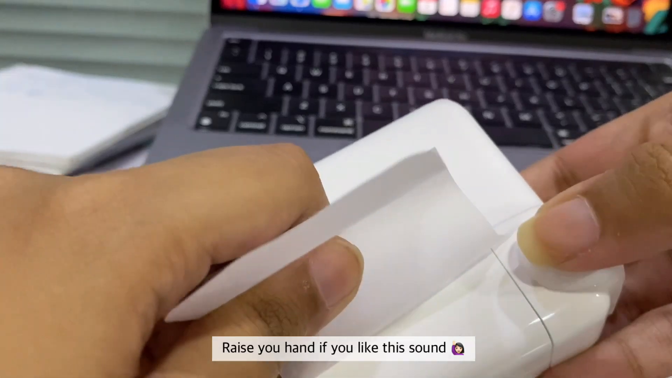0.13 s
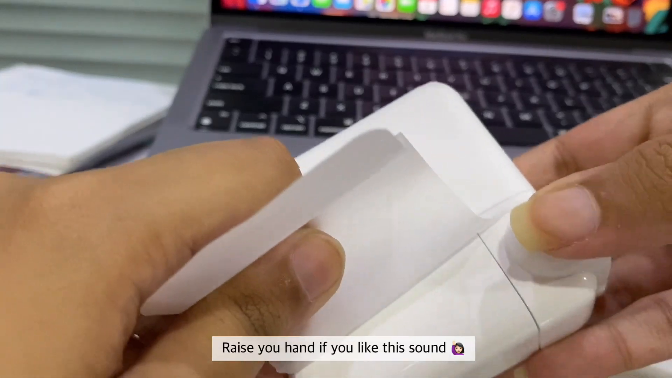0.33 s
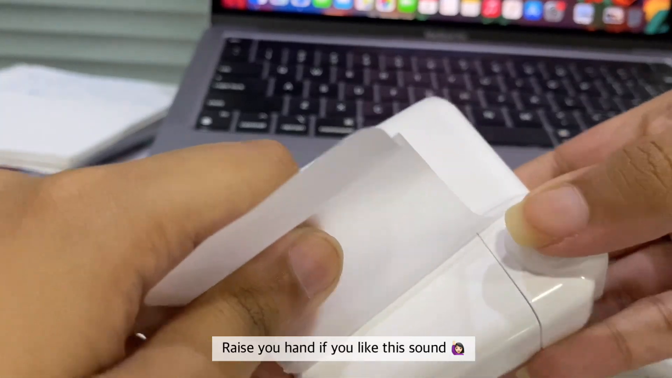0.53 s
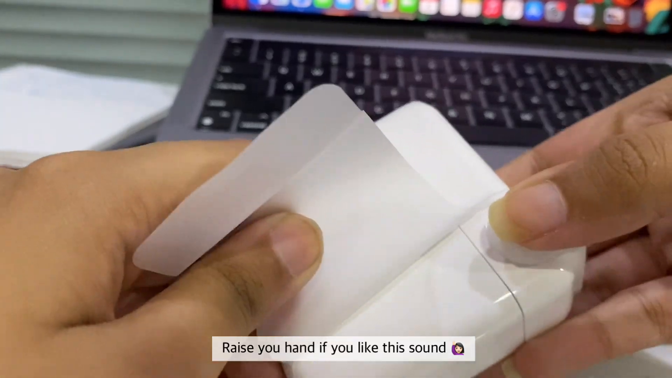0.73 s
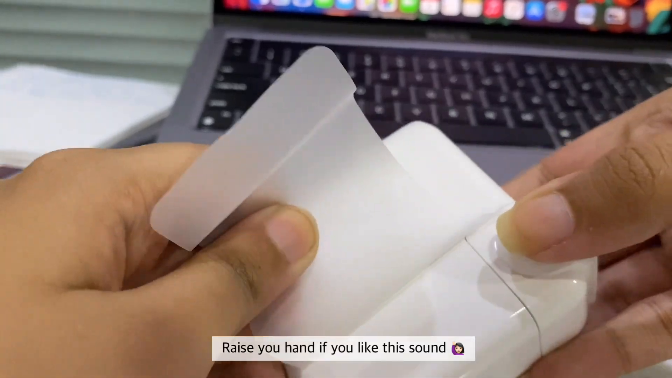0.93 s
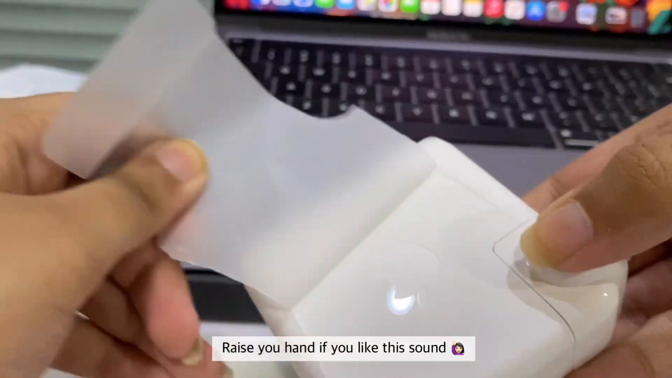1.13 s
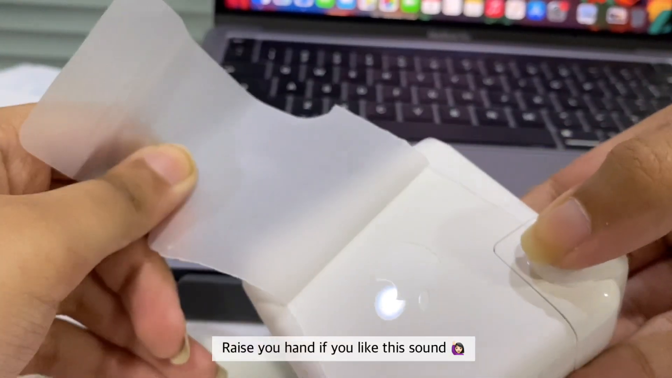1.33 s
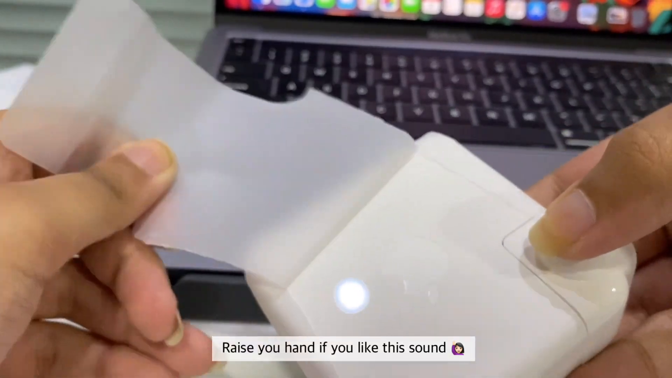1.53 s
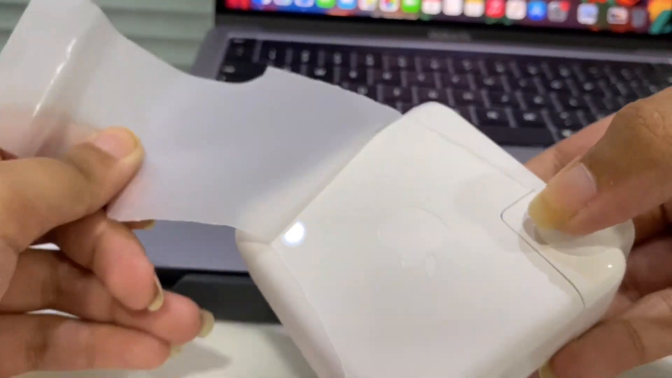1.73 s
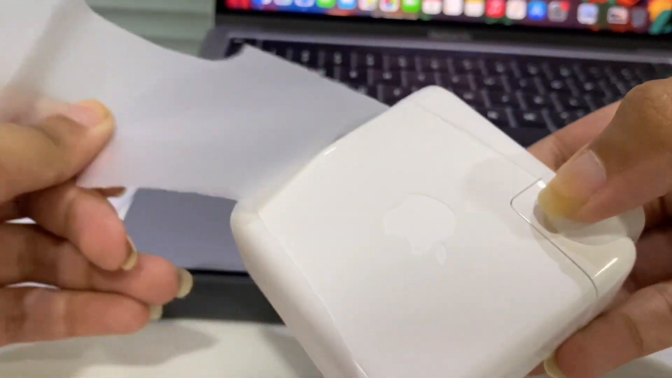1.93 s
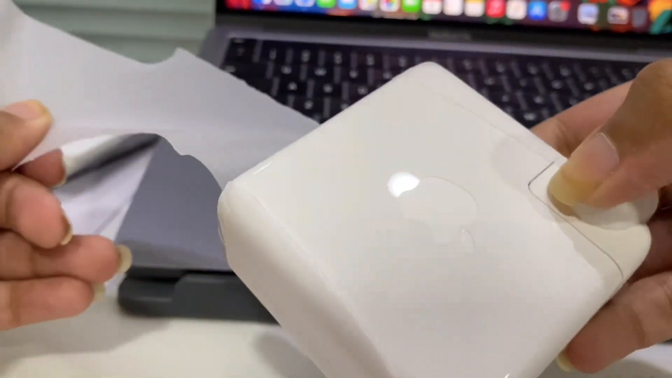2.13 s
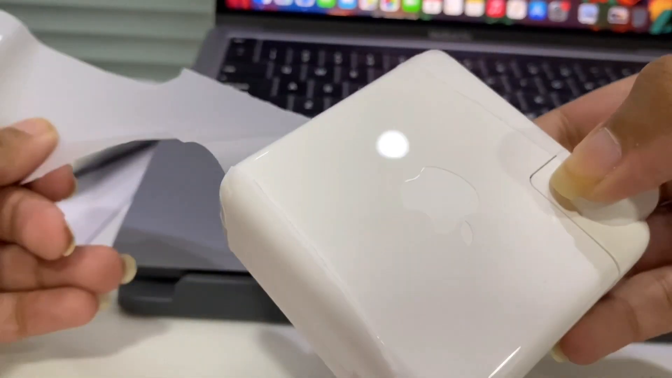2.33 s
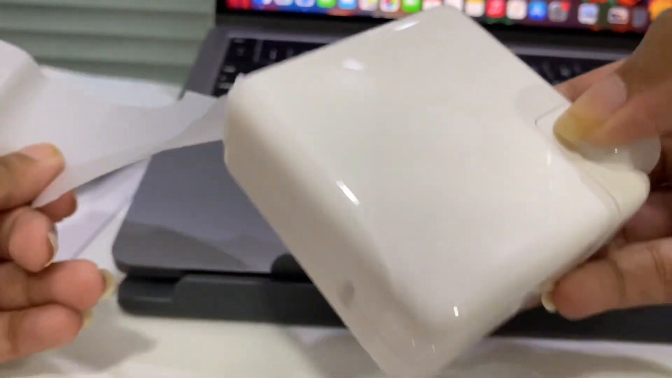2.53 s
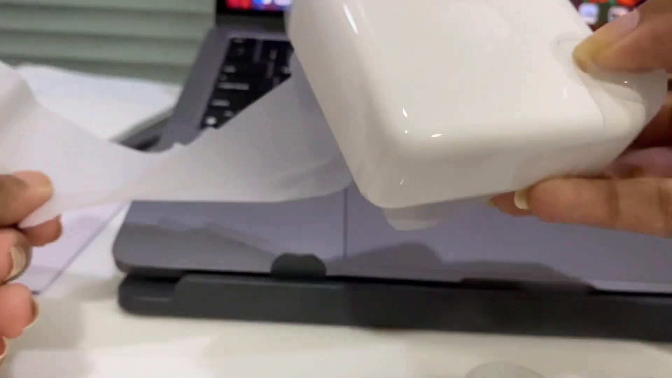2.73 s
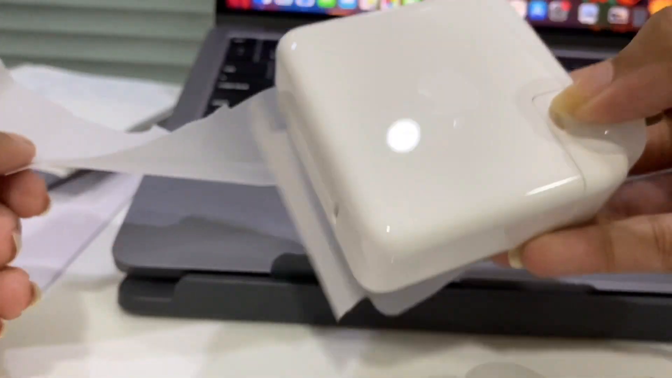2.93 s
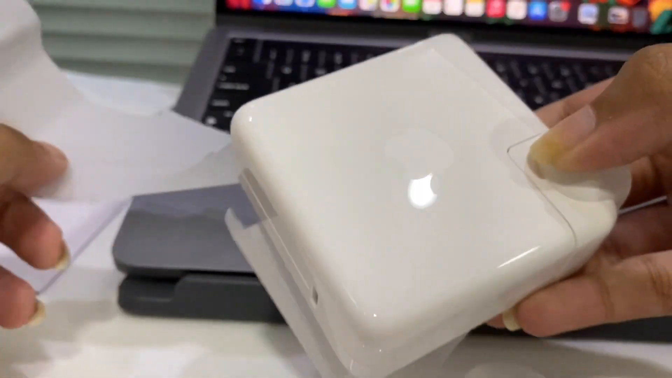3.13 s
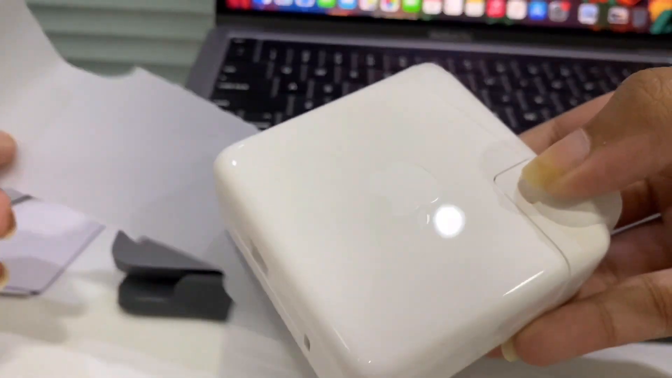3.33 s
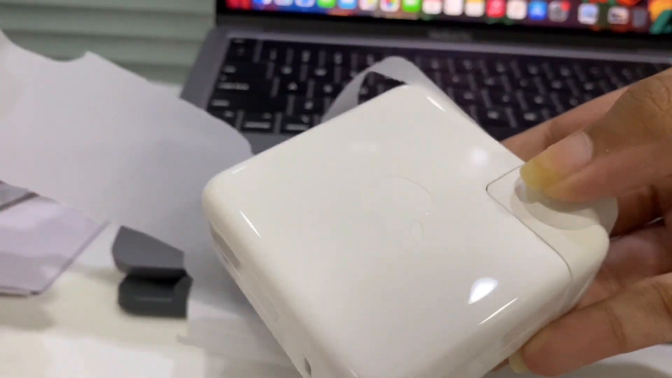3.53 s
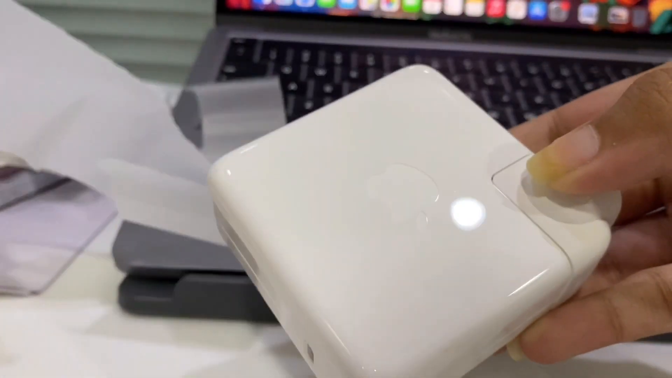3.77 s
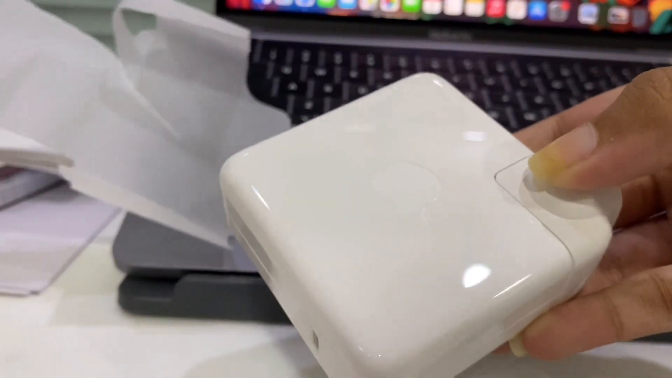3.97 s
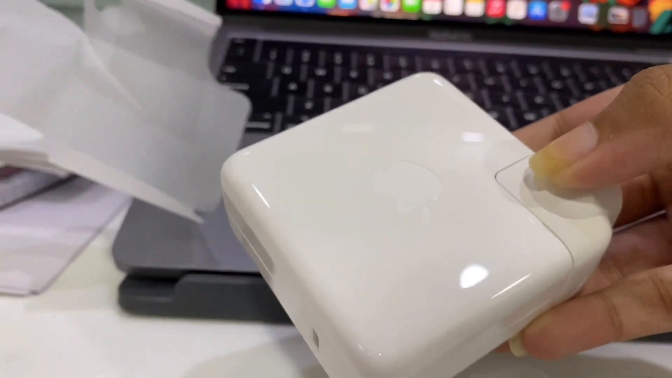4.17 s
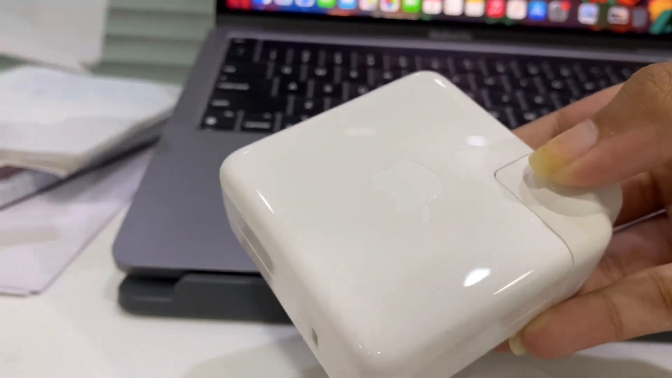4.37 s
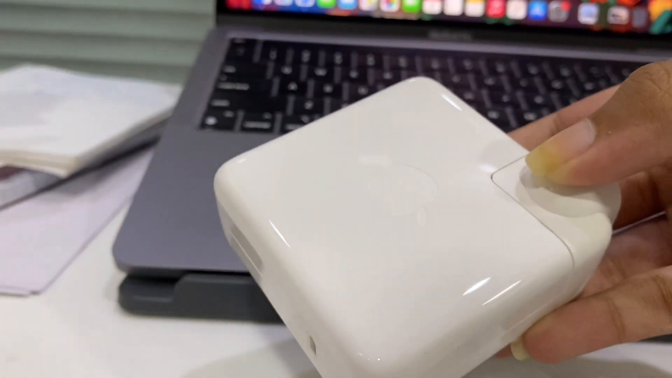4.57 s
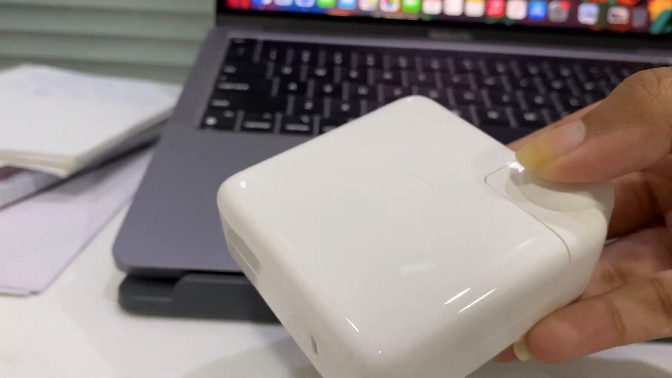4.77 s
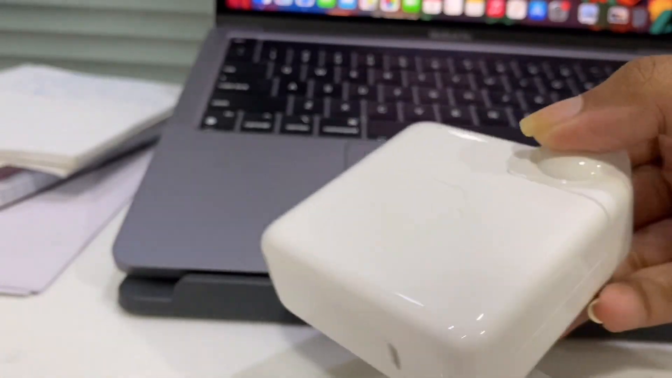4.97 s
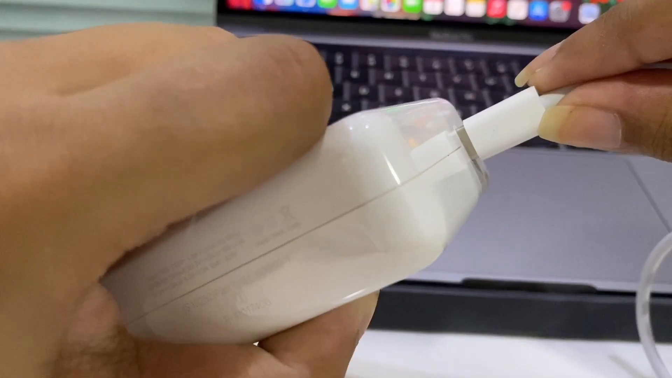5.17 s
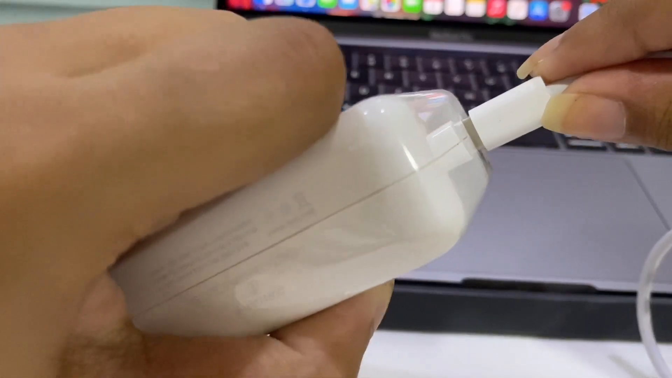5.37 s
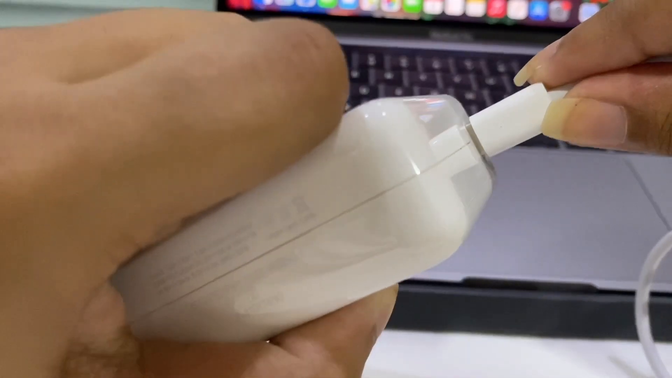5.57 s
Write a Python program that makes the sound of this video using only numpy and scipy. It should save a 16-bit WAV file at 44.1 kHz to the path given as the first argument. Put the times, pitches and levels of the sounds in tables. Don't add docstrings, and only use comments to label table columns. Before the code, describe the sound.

Adhesive plastic peels in several jerks inside a quiet room. Soft crackles build suddenly into strong tearing bursts, with hollow buckling thumps and fluttering from the freed sheet. Handling crinkles fill the middle, one last hard pull follows, then the rustle dies away to low room hum with a few tiny ticks. Bright, dry, close phone sound with a short room tail.

```python
import sys
import numpy as np
from scipy import signal
from scipy.fft import rfft, irfft
from scipy.io import wavfile
from scipy.ndimage import uniform_filter1d

SR = 44100
rng = np.random.default_rng(int(sys.argv[2]) if len(sys.argv) > 2 else 0)


def transcribe(signal):
    frames = np.atleast_2d(signal).T
    limited = np.clip(frames, -1, 1)
    pcm = np.round(limited * 32767).astype(np.int16)
    wavfile.write(sys.argv[1], SR, pcm)


def level_to_linear(level):
    exponent = np.asarray(level, float) / 20
    return 10 ** exponent


N = 247048

# (t/s, level above 9.5 kHz/dB, then relative to it:
# 6-9.5 kHz level/dB, 2.8-6 kHz level/dB, 0.7-2.8 kHz level/dB; ring of the air wedge under the film f/Hz)
RIPS = [
    [(0.0, -45.5, -1, -4, -10, 3880), (0.026, -40.5, -15, 9, -12, 3870), (0.098, -53.5, -3, -17, -14, 4010),
     (0.11, -63, -3, 6, 0, 4080)],
    [(0.5, -58.5, -5, -2, -7, 4460), (0.506, -47, -3, 1, -2, 4460), (0.536, -39, -2, -5.5, -17, 4360),
     (0.56, -53.5, -2.5, -4.5, -7, 4320)],
    [(0.755, -51, -4, -12, -6.5, 3800), (0.813, -24.5, -3, -4, -11, 3900),
     (0.827, -32, -10.5, -0.5, 1.5, 3830), (0.875, -30.5, -4.5, -0.5, -13, 4550),
     (0.93, -56.5, -6.5, -5, -1.5, 4650)],
    [(0.982, -21.5, -3, 2.5, -6, 4400), (1.074, -18, 3.5, -1.5, -9.5, 4800),
     (1.16, -30.5, -1.5, -3.5, -6, 5010), (1.162, -40.5, -1.5, -4, -2, 4990), (1.19, -46, -5, -6, -8, 5010)],
    [(1.375, -47.5, -3, -17, -1.5, 4800), (1.391, -32, -11.5, -9, 1.5, 4760),
     (1.419, -55.5, -1, -3, -2, 4710), (1.451, -48, -5.5, -4, -8, 4420), (1.545, -26, 6, -1, -3.5, 5170),
     (1.619, -36.5, 0.5, -3.5, -5, 4700), (1.7, -52, -8, -10, -8, 5270)],
    [(1.795, -45.5, -12, -8.5, 2.5, 4350), (1.813, -37, 4, 4, -1, 4300), (1.917, -35, -9, -7, -4.5, 5200),
     (1.945, -14, -2, -3, -4, 5460), (1.993, -26.5, 0.5, 2, -3, 5400), (2.035, -42.5, -18.5, -6, 3.5, 4340)],
    [(2.42, -42, -8.5, -9.5, -8, 4140), (2.434, -33, -17.5, -2, -10, 4110), (2.464, -45, -6, -1.5, 4, 4040),
     (2.48, -52, -6, 7, 0, 4030)],
    [(2.525, -41, -6.5, 5.5, -7, 4760), (2.535, -30.5, -10, -8.5, -2.5, 4840),
     (2.605, -16.5, -3, 0, -14, 4850), (2.695, -31.5, 2, 9.5, -8, 5030), (2.715, -44, -7, 2, -3, 4780)],
    [(3.272, -23.5, -13, -1.5, -8.5, 4220), (3.302, -36, -3, -1, 0.5, 4280), (3.338, -39, -4, 2, 3.5, 4520),
     (3.35, -51, 0, -11, -7, 4500)],
    [(4.045, -72, -3, -3, 6, 5420), (4.049, -63, -1, 0, -5, 5280), (4.131, -58.5, -7, -9, -5, 5300),
     (4.14, -63, 4, -3, -2, 5500)],
    [(4.17, -46, -6, -11, -28, 5470), (4.184, -45, 0, -6, -31, 5490), (4.194, -54, -5, -9, -7, 5500),
     (4.2, -63, -2, -7, -5, 5500)],
    [(4.59, -66.5, -6, -16.5, -9, 4430), (4.6, -57.5, -5.5, -19, -14, 4700),
     (4.662, -57.5, -9, -18, -11, 4460), (4.762, -69.5, -1, -5, -4, 5200), (4.78, -72.5, -7, -4, 6, 4370)],
    [(4.878, -36, -8, -1, 0.5, 4270), (4.892, -46, -1, -4, -0.5, 4260), (4.972, -63.5, -6, 0, 7, 4270),
     (4.992, -46, -1.5, -7, 2, 5200), (5.03, -72.5, -2, 5, 6, 5040)],
]
# (t/s, level above 9.5 kHz/dB, 6-9.5 kHz level/dB,
# 2.8-6 kHz level/dB)
RUSTLES = [
    [(0.11, -64.5, -73, -70), (0.23, -71.5, -66, -67), (0.5, -65, -63, -63)],
    [(0.56, -65.5, -72, -70), (0.656, -61, -79, -52.5), (0.755, -61, -80, -72)],
    [(1.7, -51.5, -59, -62), (1.795, -46, -49, -50)],
    [(2.715, -50, -43, -55), (2.861, -50, -63, -55), (3.003, -48, -47.5, -53.5), (3.167, -51, -67, -56),
     (3.272, -43, -49, -48)],
    [(3.35, -50, -50, -49), (3.564, -53.5, -62, -58), (3.716, -63.5, -57, -55), (3.918, -67.5, -67, -68),
     (4.045, -67, -73, -66)],
    [(4.2, -72.5, -75, -82), (4.43, -75, -80, -78.5), (4.59, -74.5, -74, -73.5)],
    [(4.78, -66.5, -76, -73), (4.826, -66.5, -75, -75), (4.878, -67.5, -72, -71)],
    [(5.03, -83.5, -81.5, -78), (5.32, -80.5, -81, -80.5), (5.6, -73.5, -76.5, -70)],
]


def peel():
    rustles = [[(s, top, treble - top, upper - top, upper - top - 6, 4500)
                for s, top, treble, upper in rows] for rows in RUSTLES]
    in_order = sorted(RIPS + rustles, key=lambda rows: rows[0][0])
    gate, top_db, *shares_db, wedge_hz = played(in_order)
    regions_db = top_db + np.array(shares_db[::-1] + [0 * top_db])
    hz = np.geomspace(800, 15200, num=19)
    levels_db, colour = film_colour(hz, regions_db)
    slide = np.clip(-.03 * (top_db + 37.5), 0, 2) + 0.41
    whole_line = evened(slips(330, 4.5, 1.0))
    gusts_db = 2.9 * drift(size=350)
    out = np.zeros(N)
    for f, width, db, gain in zip(hz, np.gradient(hz), levels_db, colour):
        patch = evened(slips(250, 4., 1.3))
        drive = (whole_line + .7 * patch + slide) * rng.standard_normal(N)
        band = bandpassed(drive, f - .5 * width, f + .5 * width)
        wedge_db = sum(3.5 / (1 + ((f / k - wedge_hz) / 500) ** 2) for k in (1, 2.65)) - 2.5
        patch_db = 2.13 * drift(size=600) + gusts_db * (top_db < -42)
        out += steadied(band, size=900) * level_to_linear(db + wedge_db + patch_db) * gain
    return gate * out


# (t/s, peak level/dB, 2.8-6 kHz share level/dB,
# 0.7-2.8 kHz share level/dB, own ring f/Hz)
SNAPS = [(0.0149, -25, -2, -3, 3350), (0.0298, -21, -1, -6, 13500), (0.0655, -36, -6, -14, 3730),
         (0.0866, -32.5, 0, -16, 3880), (0.188, -32, -11, -18, 3590), (0.2279, -37, -7, -21, 3650),
         (0.4354, -26, -1, -3, 3970), (0.5078, -28.5, -9.5, -16, 8210), (0.5514, -35, -25, -26, 11900),
         (0.5656, -34, -21, -26, 13000), (0.5764, -39, -24, -21, 12100), (0.632, -35, -12, -24, 3640),
         (0.6434, -33, -7, -23, 13000), (0.664, -24, -22.5, -32.5, 11600), (0.7439, -28, -2.5, -18, 12200),
         (0.7612, -24.5, -10.5, -8.5, 12300), (0.7976, -19, -14, -22, 8670),
         (0.8082, -3, -2.5, -18.5, 3330), (0.8475, -8.5, -23, -15, 12700), (0.8774, -3, -8, -20.5, 12400),
         (0.9827, 9, -13, -19.5, 4310), (1.1551, -7, -2.5, -24, 11000), (1.3356, -34, -14, -11, 11500),
         (1.3775, -23, -3.5, -21, 12500), (1.3917, -17.5, -5, -13.5, 4080), (1.4115, -28, -23, -28, 7470),
         (1.4331, -26.5, -7.5, -33, 7820), (1.4545, -17.5, -5, -22.5, 13300),
         (1.4706, -20, -17, -14, 12500), (1.4855, -10.5, -11, -10.5, 3900), (1.5171, -7.5, -8, -7.5, 7280),
         (1.5264, -6.5, -5.5, -18, 11400), (1.5453, -8.5, -11, -22, 8270), (1.6122, -12.5, -3, -39.5, 6520),
         (1.6207, -14, -10, -4, 6790), (1.6496, -16.5, -4, -6.5, 7770), (1.6933, -25, -11, 1.5, 11400),
         (1.7439, -30.5, -18, -23, 7430), (1.761, -24, -19, -22, 12800), (1.8003, -15, -8, -8.5, 1870),
         (1.8213, -13.5, -7.5, -7.5, 3630), (1.8512, -15, -12, -3.5, 11200),
         (1.8851, -14, -23, -24.5, 12500), (1.94, -5, -12, -12, 11500), (1.9596, -4, -14, -26, 6270),
         (1.9756, 1, -12.5, -22, 6800), (1.9969, -5, -3.5, -1.5, 9150), (2.1252, -28.5, 0, -4, 1630),
         (2.3585, -44, -18, -3, 1550), (2.4345, -25.5, -9, -16.5, 10200), (2.4668, -28, -10, -9, 2590),
         (2.4887, -29.5, -15, -5, 12700), (2.5034, -20.5, -9, 4.5, 3220), (2.5438, -8, -13, -17, 12400),
         (2.548, -12.5, -15, 1.5, 11700), (2.581, -12.5, -23, -30.5, 11600),
         (2.593, -4.5, -28.5, -29, 11400), (2.6163, -2, -7, -22, 12000), (2.6482, -7, 3, -25, 5050),
         (2.6632, -11, -10, -20, 5170), (2.695, -18, 1, -25, 5190), (2.7034, -17.5, 4, -26, 5300),
         (2.807, -18.5, -10, -2.5, 4450), (2.821, -7, 4, -28, 10200), (2.8427, -13.5, -14, -6, 4370),
         (2.9208, -2, -4.5, -16, 10300), (3.04, -26.5, -8, -20, 3800), (3.0697, -24.5, -33, -5, 10200),
         (3.164, -25, -13, -10, 5330), (3.1792, -7, -8, -14.5, 12300), (3.2593, -23, -19, -28, 11600),
         (3.273, -2.5, -16, -18, 11800), (3.3077, -18, -8, -17, 1640), (3.3312, -13.5, -8, 0, 12400),
         (3.4855, -18.5, -2.5, 1, 2040), (3.5648, -29.5, -6, -7.5, 2860), (3.6007, -21, -6, 0.5, 12800),
         (3.6555, -19.5, -4.5, -28, 13100), (3.672, -22.5, -5, -9, 2570), (3.688, -22.5, -7, -22, 11600),
         (3.7403, -32, -13, 5, 11800), (3.876, -31.5, -7, -2, 12300), (3.908, -32, -9, -25, 10400),
         (3.947, -35, -13, -6, 11900), (3.987, -41, -9, -6, 1880), (4.7468, -44, -11, -11, 1780),
         (4.8768, -19, -19, -9, 8780), (4.927, -41, -14, -12, 1700), (4.9891, -32, -10, -4.5, 12200),
         (5.384, -54, -18, -2, 1524), (5.4886, -47, -14, -9, 1680), (5.515, -45, -5, -3.5, 2550)]


def snaps():
    out, t, hz = np.zeros(N), np.arange(1024) / SR, np.fft.rfftfreq(1024, 1 / SR)
    onset = 1 - np.exp(-t / 0.00045)
    shape = onset * (np.exp(-t / 0.00086) + .1 * np.exp(-t / 0.01))
    noises = rng.standard_normal((len(SNAPS), 1024))
    for (s, db, upper_db, mid_db, ring_hz), noise in zip(SNAPS, noises):
        top_db = 10 * np.log10(max(1 - level_to_linear(upper_db) ** 2, .1) / 2)
        levels_db, colour = film_colour(hz, np.array([mid_db, upper_db, top_db, top_db]))
        ring = 1 + 1.9 / np.sqrt(1 + ((hz - ring_hz) / (0.051 * ring_hz)) ** 2)
        crack = shape * irfft(rfft(noise) * level_to_linear(levels_db) * colour * ring)
        add(out, s, level_to_linear(db + 1) * crack / abs(crack).max())
    return out


# (f/Hz, level per Hz/dB)
FILM = [(350, -46), (600, -3.5), (2000, -2.5), (4300, -2), (7280, -4.5), (12700, -2.5), (15600, -15),
        (16500, -43.5)]
EDGES_HZ = np.array([700, 2800, 6000, 9500, 16500])


def film_colour(hz, shares_db):
    region = np.clip(np.searchsorted(EDGES_HZ, hz) - 1, 0, 3)
    power = level_to_linear(read(FILM, hz)) ** 2 * np.gradient(hz)
    own_db = 10 * np.log10(np.bincount(region, power))
    middles = np.log(EDGES_HZ[1:] * EDGES_HZ[:-1]) / 2
    blend = np.array([np.interp(np.log(hz + 1), middles, row) for row in np.eye(4)]).T
    return blend @ shares_db, level_to_linear(read(FILM, hz) - blend @ own_db) * np.sqrt(np.gradient(hz))


# (t/s, level/dB, drum pitch f/Hz, share of pushed air level/dB)
FLAPS = [
    [(0.56, -55, 323, -2), (0.566, -51.5, 323.5, 2.5), (0.64, -60, 325, 2.5)],
    [(0.8, -40, 497, -5.5), (0.822, -21, 497, -17), (0.884, -32, 484, 0.5), (0.96, -50.5, 447, 2.5)],
    [(0.98, -29, 389, -17), (1.046, -29, 345, -16.5), (1.16, -38.5, 228, -12), (1.22, -69, 212, 7)],
    [(1.34, -51, 371, -4), (1.35, -40, 376, -6.5), (1.442, -50.5, 302, -3), (1.532, -33.5, 305, 1),
     (1.7, -48.5, 406, -5)],
    [(1.79, -42, 268, -14), (1.918, -47.5, 318, -1), (1.964, -35, 324, -6.5), (2.05, -56, 347, 4.5)],
    [(2.53, -45, 506, -8.5), (2.602, -31, 487, -11), (2.716, -44, 436, -7), (2.74, -73, 426, 12)],
    [(3.26, -56, 307, -13), (3.276, -38.5, 305, -13), (3.378, -58, 331, 6), (3.53, -53.5, 357, -2)],
]


def flap():
    gate, db, hz, puff_db = played(FLAPS)
    beats = (evened(slips(90, 3., 9.0)) + .4) * rng.standard_normal(N)
    turn, r = np.exp(2j * np.pi * np.cumsum(hz) / SR), np.exp(-np.pi * 200 / SR)
    ring = evened((turn * signal.lfilter([1 - r], [1, -r], beats / turn)).real)
    skin = evened(bandpassed(beats, 140, 850))
    puff = bandpassed(rng.standard_normal(N), 60, 120)
    sheet = steadied(ring + 1.2 * skin, size=2000)
    pushed_air = level_to_linear(puff_db) * steadied(puff, size=2000)
    return uniform_filter1d(gate, size=400) * level_to_linear(db) * (sheet + pushed_air)


# (t/s, peak level/dB, f/Hz)
THUDS = [(0.762, -36, 937), (0.788, -26, 850), (0.808, -15.5, 664), (0.821, -8.5, 433), (0.832, -11, 409),
         (0.841, -14, 366), (0.85, -21.5, 363), (0.862, -17.5, 334), (0.909, -35, 425), (0.983, -13.5, 934),
         (1.349, -31.5, 450), (1.959, -21, 250), (2.823, -35.5, 662), (2.926, -25, 689), (3.275, -28, 269),
         (3.487, -36, 670)]


def thuds():
    out, t = np.zeros(N), np.arange(2000) / SR
    onset = 1 - np.exp(-t / 0.00053)
    for s, db, hz in THUDS:
        turns = 2 * np.pi * hz * (t - 2.1 * t ** 2)
        modes = np.sin(turns) + 0.52 * np.sin(1.8 * turns)
        add(out, s, level_to_linear(db - 1.5 - 60 * t / .045) * onset * modes)
    return out


def slips(per_s, spread_db, ring_ms):
    size = level_to_linear(spread_db * np.minimum(rng.exponential(1, N), 4))
    hits = size * (rng.random(N) < per_s / SR)
    return signal.lfilter([1], [1, -np.exp(-1000 / (ring_ms * SR))], hits)


def steadied(x, size):
    power = abs(uniform_filter1d(x ** 2, size=size))
    return x / np.sqrt(power + 1e-3 * np.mean(x ** 2))


def drift(size):
    once = uniform_filter1d(rng.standard_normal(N), size=size)
    return evened(uniform_filter1d(once, size=size))


def bandpassed(x, low_hz, high_hz):
    return signal.sosfilt(signal.butter(2, [low_hz, high_hz], "band", fs=SR, output="sos"), x)


def played(tables):
    s, *columns = np.concatenate(tables).T
    t = np.arange(N) / SR
    gate = sum((t >= rows[0][0]) & (t < rows[-1][0]) for rows in tables)
    return uniform_filter1d(np.minimum(gate, 1.), size=60), *(np.interp(t, s, c) for c in columns)


def read(points, hz):
    f, value = np.transpose(points)
    return np.interp(np.log(hz + 1), np.log(f + 1), value)


def evened(x):
    return x / np.sqrt(np.mean(x ** 2) + 1e-20)


def add(mix, s, sound):
    part = mix[round(s * SR):][:len(sound)]
    part += sound[:len(part)]


# (f/Hz, fall by 60 dB t/s)
ROOM = [(300, 0.29), (1500, 0.55), (5000, .55), (12000, 0.47)]


def room(x):
    taps, at = np.zeros(SR), np.arange(300, SR - 20, 20)
    taps[at + rng.integers(0, 20, len(at))] = rng.choice([-1., 1.], len(at))
    hz, t, z = signal.stft(taps, SR, nperseg=256)
    fade = level_to_linear(-60 * t / read(ROOM, hz)[:, None])
    tail = signal.istft(z * fade, SR, nperseg=256)[1]
    return signal.fftconvolve(x, tail / np.linalg.norm(tail))[:N]


# (f/Hz, level per Hz/dB)
AIR = [(18, -54.5), (30, -9.5), (118, -1.5), (242, -6.5), (314, 0.5), (493, -7.5), (562, -16.5),
       (659, -10.5), (1000, -13.5), (3050, -28), (3970, -35), (12700, -47), (16500, -59.5)]


def air():
    frames, hz = N // 512 + 5, np.fft.rfftfreq(2048, 1 / SR)
    a, b, patches = rng.standard_normal((frames, 1025, 3)).T
    patches = uniform_filter1d(patches, size=10, axis=0)
    patches = evened(uniform_filter1d(patches, size=6, axis=1))
    z = (a + 1j * b) * level_to_linear(read(AIR, hz)[:, None] + 2.6 * patches)
    hiss = signal.istft(z, nperseg=2048, noverlap=1536)[1][:N]
    return level_to_linear(-50.5) * evened(hiss)


def scene():
    film = peel() + snaps() + flap() + thuds()
    change_s = 5.032
    before_change = np.arange(N) < change_s * SR
    tail = level_to_linear(-20.5) * room(film) * before_change
    return (film + tail + air())[None]


def band_limit(x):
    return signal.sosfilt(signal.butter(12, 16990, fs=SR, output="sos"), x)


def record(dry):
    thinned = signal.sosfilt(signal.butter(4, 55, "high", fs=SR, output="sos"), dry)
    limited = np.tanh(thinned / .9) * .9
    band_edge = signal.firwin(255, 16000, window=("kaiser", 7), fs=SR)
    mix = signal.oaconvolve(limited, band_edge[None], "same")
    return band_limit(mix)


dry = scene()
out = record(dry)
transcribe(out)
```